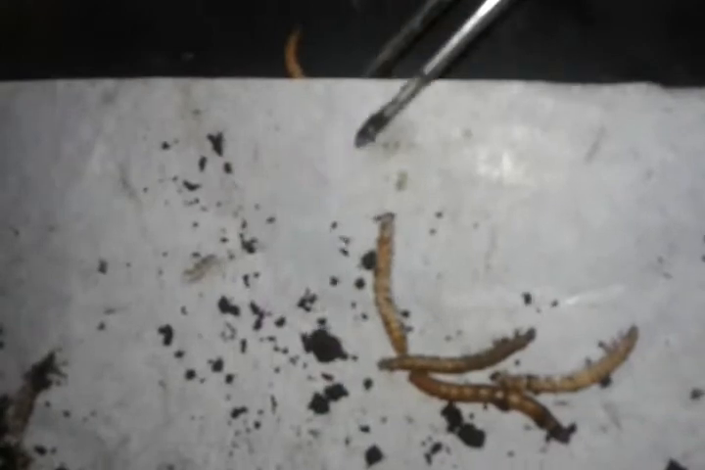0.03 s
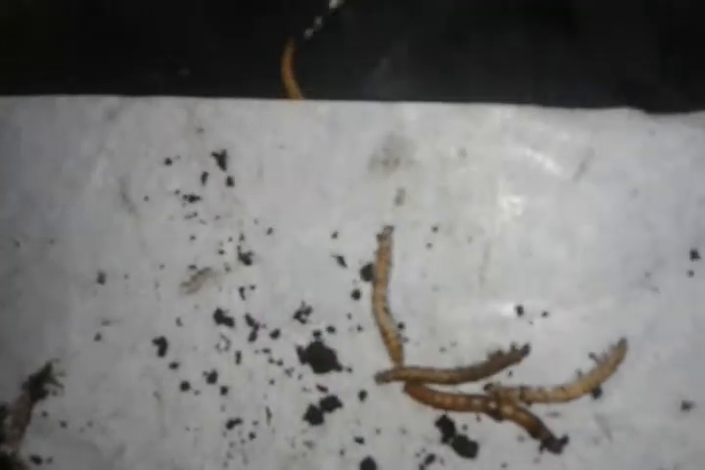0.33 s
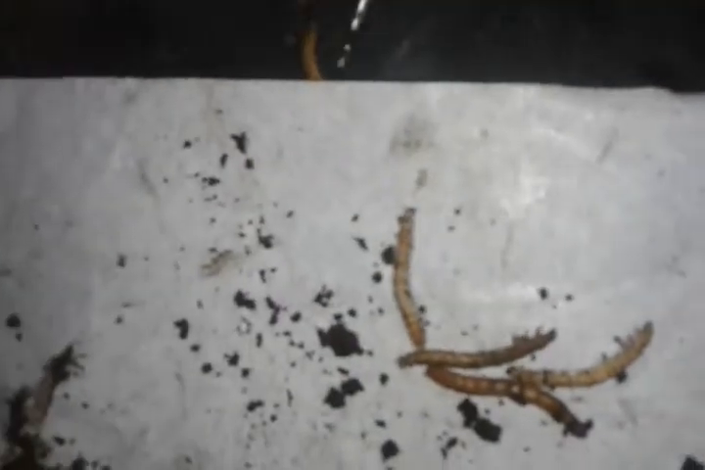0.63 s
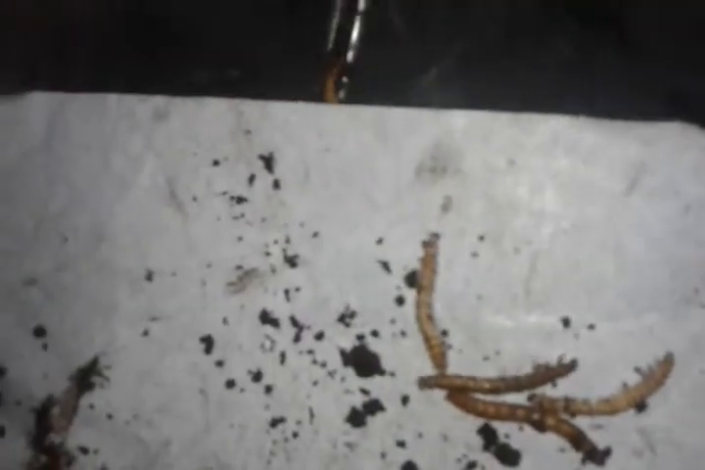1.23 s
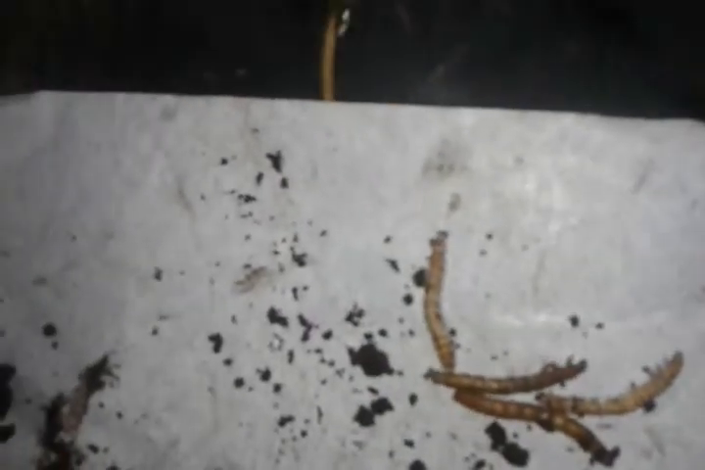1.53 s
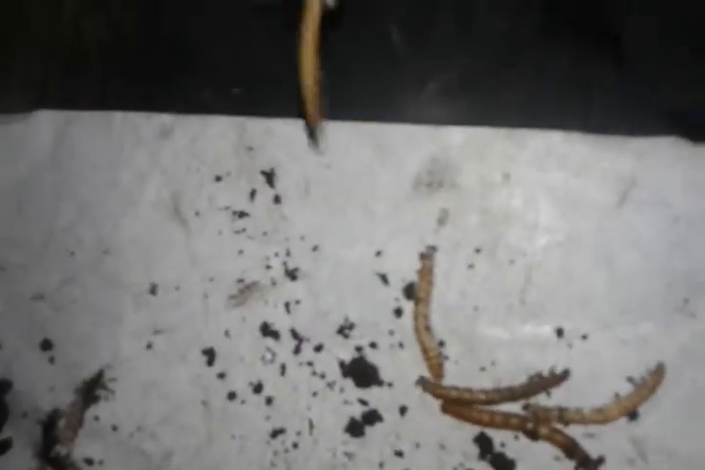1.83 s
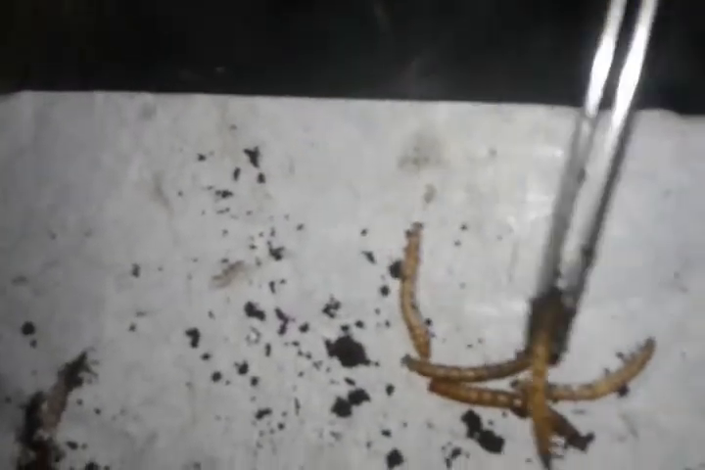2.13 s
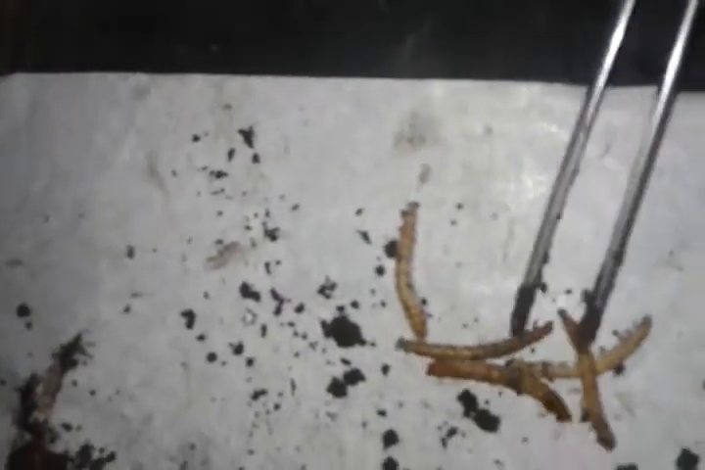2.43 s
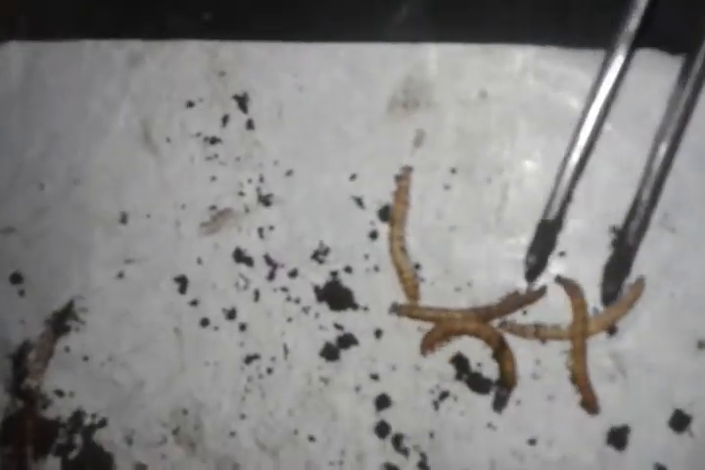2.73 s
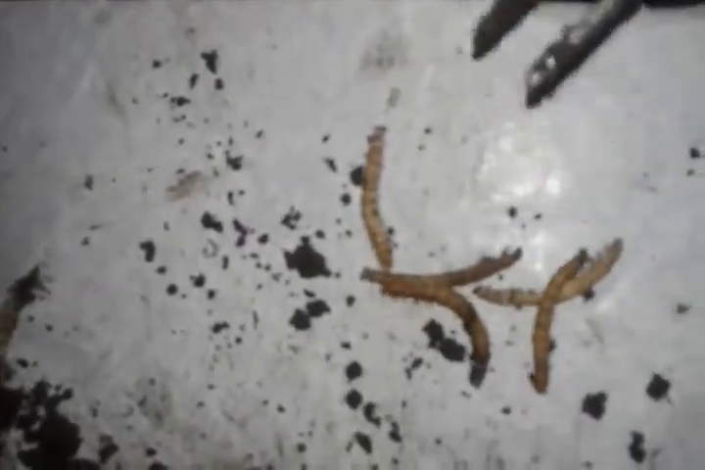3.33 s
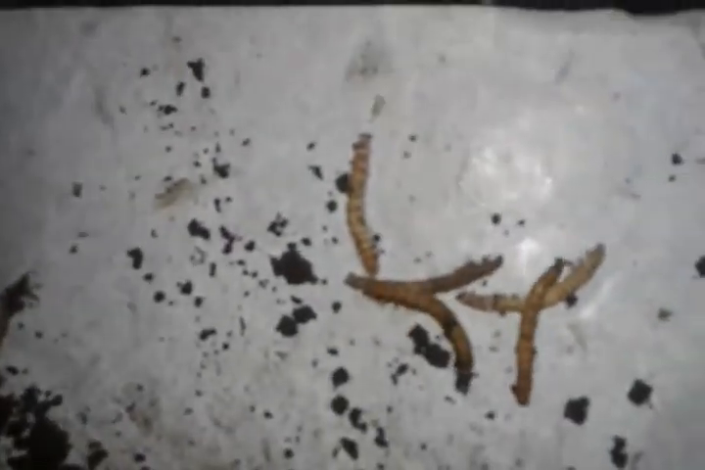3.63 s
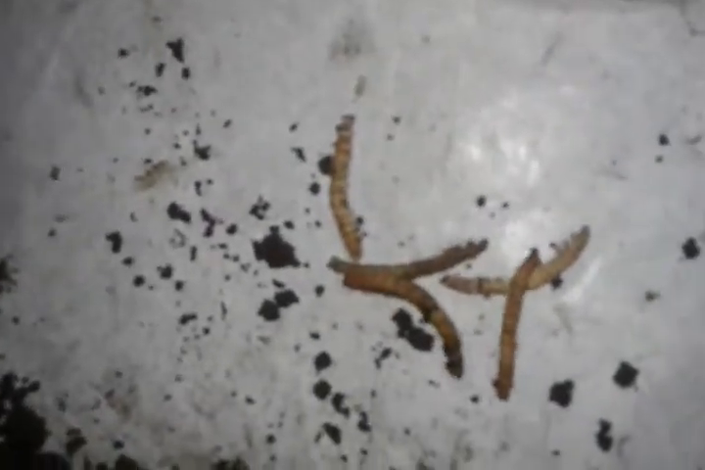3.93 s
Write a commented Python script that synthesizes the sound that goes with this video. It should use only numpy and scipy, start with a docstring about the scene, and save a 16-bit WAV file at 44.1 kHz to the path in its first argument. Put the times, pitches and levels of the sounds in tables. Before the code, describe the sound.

Close steel tweezers scraping faintly over paper, with ringing taps and sharp clicks.

```python
"""A paper-lined tray in a quiet room, close to a small microphone: steel tweezers move larvae about.
The tips scratch among crumbs, slide over the paper, tick and squeak faintly; set down, they ring
the steel and knock the tray, and a long, soft reverberation follows. Near the end the steel arms
snap and rattle. Faint room noise and a few low handling bumps lie underneath."""
import sys
import numpy as np
from scipy import signal
from scipy.fft import rfft, irfft, next_fast_len
from scipy.io import wavfile
from scipy.ndimage import map_coordinates

SR = 44100
rng = np.random.default_rng(int(sys.argv[2]) if len(sys.argv) > 2 else 0)


def put_to_file(sound):
    """Save the sound as 16-bit audio at rate SR, in the file named by the first command-line argument."""
    columns = np.atleast_2d(sound).T  # one column per channel
    safe = np.clip(columns, -1, 1)
    whole_steps = np.round(safe * 32767)
    wavfile.write(sys.argv[1], SR, whole_steps.astype(np.int16))


N = 176400

# Noise colours. Each row: frequency in Hz, relative spectral level in dB.
ROOM_COLOUR = [(25, -35), (50, -2.5), (213, 3), (403, -4.5), (700, -13), (1260, -36), (1360, -27),
               (1870, -25.5), (2710, -31.5), (4030, -25), (6000, -27), (14000, -26)]  # low room noise
GRIT_COLOUR = [(1180, -29), (2910, -24.5), (4300, -14.5), (4750, -3), (5120, 5.5), (6000, -8.5),
               (8590, -22.5), (12700, -29), (14000, -34)]  # steel scratching
PAPER_COLOUR = [(200, -2), (700, 1), (1400, 1.5), (2500, -0.5), (3800, -0.5), (5100, 7.5), (6500, -4.5),
                (9500, -16), (14000, -21.5)]  # steel sliding on paper
BRUSH_COLOUR = [(2000, -19.5), (4200, -13.5), (5300, 5), (6800, -9), (8500, -4), (11000, -13), (14000, -22)]  # light brushes and crackling crumbs
CONTACT_COLOUR = [(200, -5), (1000, -4), (1800, -12), (2300, -1.5), (3100, -6.5), (4200, -2), (5100, 6),
                  (6300, -11), (8000, -16), (10000, -24.5), (14000, -28)]  # the bite of a tap or snap
RATTLE_COLOUR = [(150, -24), (500, -3), (1400, -2.5), (1850, 8.5), (2200, 1), (3500, 0.5), (5000, -2),
                 (6500, -11.5), (9000, -26), (14000, -26)]  # the arms rattling
THUD_COLOUR = [(60, -44), (150, -4), (350, -11), (550, 5.5), (780, 1), (910, 4), (1100, -6), (1600, -9),
               (4000, -26)]  # the dull body of a click
BUMP_COLOUR = [(80, -57), (115, 17.5), (170, -4), (270, 8.5), (420, -4.5), (700, -6), (2000, -53)]  # handling
TAIL_COLOUR = [(59, -40), (100, -17.5), (229, -11.5), (318, -1), (656, -2), (895, -4), (1150, -8.5),
               (1410, -2), (1770, -14.5), (3030, -17), (3360, -13.5), (4050, -10), (5190, 2.5), (6250, -11),
               (14000, -40.5)]  # the reverb wash
# Fader rides. Each row: time in seconds, level in dB.
ROOM_FADER = [(0, -53.5), (.6, -58.5), (1.3, -61), (1.7, -56), (2.05, -59.5), (4, -53.5)]  # room noise
SCRATCH_FADER = [(0, -41), (.04, -38), (.06, -31), (.09, -35), (.135, -38), (.2, -56), (.46, -67),
                 (.535, -57.5), (.58, -63), (.76, -78), (.82, -58), (.95, -64), (1.1, -71.5), (1.43, -73.5),
                 (1.52, -51.5), (1.75, -66), (2, -73), (3.5, -73), (3.68, -53.5), (3.95, -58), (4, -51.5)]  # tips among crumbs
SLIDE_FADER = [(0, -58), (.31, -56), (.45, -61.5), (1.4, -69.5), (1.5, -53.5), (1.7, -57.5), (1.95, -68),
               (2.03, -71), (2.06, -55.5), (2.15, -66), (2.85, -58.5), (3.06, -52.5), (3.14, -54),
               (3.21, -49), (3.45, -53), (3.56, -55.5), (3.605, -44.5), (3.66, -51), (3.8, -55.5), (4, -58)]  # tips on paper
# Noise strokes. Each row: start in seconds, length in seconds, level in dB.
BRUSH_CUES = [(.211, 0.022, -50), (1.278, 0.026, -50), (1.555, .09, -54), (3.63, 0.15, -55.5)]  # light brushes over the paper
BUMP_CUES = [(3.62, 0.079, -46), (3.893, 0.046, -43.5), (3.93, 0.048, -54.5)]  # soft handling bumps
# Soft nudges. Each row: start in seconds, t60 in seconds, pitch in Hz, level in dB.
NUDGE_CUES = [(0.268, 0.51, 1650, -52), (.564, 0.056, 780, -46.5), (.9, 0.16, 770, -52.5),
              (1.68, 0.04, 1350, -50.5), (2.098, 0.025, 970, -46.5), (3.058, 0.042, 1280, -46),
              (3.278, 0.024, 1420, -40), (3.328, 0.062, 1620, -43.5), (3.59, 0.12, 1270, -39.5),
              (3.939, 0.06, 1340, -46.5)]
# Tips ticking on crumbs and on each other.
# Each row: start in seconds, level in dB, pitch in Hz, contact length in seconds.
TICK_CUES = [(0.495, -45.5, 4950, 0.00056), (0.6244, -40.5, 2300, 0.0017), (0.6296, -41.5, 5870, 0.0016),
             (0.6542, -31, 4850, 0.0008), (.853, -44, 5500, 0.0065), (1.465, -48.5, 5540, 0.0017),
             (1.497, -38.5, 5440, 0.0009), (1.506, -41, 5100, 0.0011), (1.523, -31.5, 2920, 0.0013),
             (1.526, -34.5, 3430, 0.00096), (1.541, -38, 5640, 0.001), (2.537, -36.5, 5100, 0.0027),
             (3.1033, -26, 2730, 0.00065)]
# Tips meeting the tray. Each row: start in seconds, level in dB, knock in dB relative to that level,
# contact length in seconds, reverb send in dB.
TAP_CUES = [(2.161, -13, 1.5, 0.0037, 2.5), (2.584, -34, 4.5, 0.0049, 0), (2.5875, -30, -20, 0.005, -6.5),
            (2.591, -32.5, -3, 0.0061, -13), (2.6055, -20.5, 4, 0.005, -5),
            (3.1037, -26.5, -11, 0.0043, -7), (3.53, -45, -5.5, 0.0048, -8)]
# Ringing modes. Each row: pitch in Hz, relative level in dB, t60 in seconds.
STEEL_MODES = [(2520, -35, 0.02), (5053, 3, 0.014), (5800, -16, 0.014), (7760, -13, 0.015)]  # the bright tweezers
TRAY_MODES = [(325, -1.5, 0.022), (656, 0.5, 0.018), (830, -4.5, 0.01), (1393, 3.5, .017),
              (2232, -1.5, 0.012), (3390, -19, 0.011)]  # the knock of the tray
# Squeaks of sliding steel. Each row: start in seconds, length in seconds, pitch in Hz, level in dB.
SQUEAK_CUES = [(2.913, 0.13, 3080, -62.5), (3.002, 0.089, 7900, -62)]
# Clicks of the steel arms.
# Each row: start in seconds, snap in dB, rattle in dB, thud in dB, rattle t60 in seconds.
CLICK_CUES = [(3.1859, -19.5, -32, -48.5, 0.098), (3.192, -22, -29.5, -64, 0.031),
              (3.6207, -10.5, -39, -35, 0.059), (3.635, -25, -38.5, -43, 0.057),
              (3.644, -27, -57, -48, 0.028), (3.777, -39, -44, -46.5, 0.022),
              (3.8245, -32, -61, -39, 0.026), (3.8292, -8.5, -30.5, -53, 0.04),
              (3.8336, -33, -57, -45, 0.022)]
# Early reflections off the walls. Each row: delay in seconds, relative level in dB.
REFLECTIONS = [(0.0165, -3.5), (0.034, -3), (.0415, -15), (0.0524, -8.5)]
# The diffuse tail. Each row: low edge in Hz, high edge in Hz, t60 in seconds, return gain in dB.
TAIL_BANDS = [(96, 732, 1.76, -3.5), (1030, 2950, 2, -12), (3450, 4440, 1.25, -0.5),
              (6560, 20000, 0.87, -6)]

TAP_ATTACK_S, STEEL_ATTACK_S = 0.00039, 0.0032
TOP_HZ = 14200


def amp(db):
    """Decibels to gain."""
    return 10 ** (np.asarray(db) / 20)


def unit(x):
    """Scale to rms 1."""
    return x / np.sqrt(np.mean(x ** 2) + 1e-20)


def fader(points):
    """Gain per sample from (s, dB) points."""
    return amp(np.interp(np.arange(N) / SR, *np.transpose(points)))


def filtered(x, response):
    """Filter x by a gain given as a function of Hz."""
    size = next_fast_len(len(x) + 8192)
    return irfft(rfft(x, size) * response(np.fft.rfftfreq(size, 1 / SR)), size)[:len(x)]


def eq(x, colour):
    """Shape x with (Hz, dB) points joined on a log frequency axis."""
    hz, db = np.transpose(colour)
    return filtered(x, lambda f: amp(np.interp(np.log(f + 1), np.log(hz + 1), db)))


def band(x, low_hz, high_hz):
    """Steep band-pass."""
    return filtered(x, lambda f: ((1 + (low_hz / (f + 1)) ** 10) * (1 + (f / high_hz) ** 10)) ** -.5)


def noise(colour, size):
    """Coloured noise of rms 1."""
    return unit(eq(rng.standard_normal(size), colour))


def resonance(hz, width, size):
    """Noise of rms 1 around one pitch; width is a share of the pitch."""
    white = rng.standard_normal(size)
    return unit(filtered(white, lambda f: 1 / (1 + (np.log((f + 1) / hz) / width) ** 2)))


def wobble(rate):
    """A smooth random curve, rate knots a second."""
    return map_coordinates(rng.standard_normal(int(N * rate / SR) + 4), [np.arange(N) * rate / SR])


def grains(colour, rate, spread_db, hiss):
    """Tiny slips of random size, about rate a second, on a bed of hiss; rms 1."""
    slips = (rng.random(N) < rate / SR) * rng.choice([-1, 1], N) * amp(spread_db * rng.random(N))
    return unit(eq(unit(slips) + hiss * rng.standard_normal(N), colour))


def ring(modes, t, attack_s, scatter_db=0.7):
    """Damped modes, balanced a little differently at each blow."""
    partials = (amp(db + scatter_db * rng.normal() - 60 * t / t60) * np.sin(2 * np.pi * hz * t)
                for hz, db, t60 in modes)
    return sum(partials) * (1 - np.exp(-t / attack_s))


def add(track, start, sound):
    """Mix a sound in at start seconds."""
    part = track[max(round(start * SR), 0):][:len(sound)]
    part += sound[:len(part)]


def strokes(cues, colour, rise_share):
    """Short swells of noise that rise quickly and fade."""
    out = np.zeros(N)
    for start, length, db in cues:
        progress = np.arange(SR // 4) / SR / length
        swell = (1 - np.exp(-progress / rise_share)) * np.exp(-progress ** 4)
        add(out, start, amp(db) * swell * noise(colour, len(swell)))
    return out


def room_noise():
    """A faint, low bed that slowly sinks and swells."""
    return fader(ROOM_FADER) * noise(ROOM_COLOUR, N)


def scratching(pitch_ratio=1.015):
    """Tips scratch among crumbs; the pressure flutters and the resonance wanders with the grip."""
    low, high = (grains([(hz * shift, db) for hz, db in GRIT_COLOUR], rate=1600, spread_db=6.5, hiss=0.38)
                 for shift in (1 / pitch_ratio, pitch_ratio))
    grip = np.pi / 4 * (1 + np.tanh(wobble(20)))  # equal-power crossfade
    pressure = amp(wobble(29.2) + 2.55 * wobble(200))
    return fader(SCRATCH_FADER) * (np.cos(grip) * low + np.sin(grip) * high) * pressure


def sliding():
    """Tips slide over the paper with a soft, grainy hiss and a sparse crackle of crumbs."""
    crumbs = amp(-14.5) * grains(BRUSH_COLOUR, rate=76, spread_db=-12, hiss=0)
    paper = grains(PAPER_COLOUR, rate=700, spread_db=11, hiss=1.3) * amp(wobble(35))
    return fader(SLIDE_FADER) * (paper + crumbs)


def brushes():
    """Quick, bright swishes, roughened as the tips catch on the paper."""
    catching = unit(amp(3.5 * wobble(300)))
    return catching * strokes(BRUSH_CUES, BRUSH_COLOUR, rise_share=0.027)


def nudges(rise_share=0.058):
    """Soft contacts that swell and fade in one resonance."""
    out, t = np.zeros(N), np.arange(SR // 2) / SR
    for start, t60, hz, db in NUDGE_CUES:
        swell = amp(db - 60 * t / t60) * (1 - np.exp(-t / (rise_share * t60)))
        add(out, start, swell * resonance(hz, width=0.27, size=len(t)))
    return out


def ticks(t60_s=0.01):
    """Tiny contacts of the tips: a brief chatter and one short ring."""
    out, t = np.zeros(N), np.arange(SR // 8) / SR
    for start, db, hz, length in TICK_CUES:
        chatter = amp(-1.5) * resonance(hz=4540, width=0.28, size=len(t)) * np.exp(-(t / length) ** 2)
        ping = ring([(hz, 0, t60_s)], t, TAP_ATTACK_S)
        add(out, start, amp(db) * (chatter + ping))
    return out


def taps(low_cut_hz=227):
    """Tips chatter, ring the steel and knock the tray, which radiates no bass; returns direct and send."""
    direct, send, t = np.zeros(N), np.zeros(N), np.arange(SR // 8) / SR
    no_bass = signal.butter(4, low_cut_hz, "highpass", fs=SR, output="sos")
    for start, db, knock_db, length, send_db in TAP_CUES:
        chatter = amp(-1.5) * noise(CONTACT_COLOUR, len(t)) * np.exp(-(t / length) ** 2)
        steel = amp(6) * ring(STEEL_MODES, t, STEEL_ATTACK_S)
        knock = amp(knock_db) * ring(TRAY_MODES, t, TAP_ATTACK_S)
        blow = amp(db) * signal.sosfilt(no_bass, chatter + steel + knock)
        add(direct, start, blow)
        add(send, start, amp(send_db) * blow)
    return direct, send


def squeaks():
    """Steel slipping unevenly sings in a narrow resonance that swells and fades."""
    out = np.zeros(N)
    for start, length, hz, db in SQUEAK_CUES:
        swell = signal.windows.tukey(round(length * SR))
        tone = resonance(hz, width=0.026, size=SR // 2)[:len(swell)]
        add(out, start, amp(db) * swell * tone)
    return out


def clicks(snap_hz=5060, snap_t60_s=0.003, crack_t60_s=0.014, thud_t60_s=0.11):
    """The steel arms snap hard, with a short rattle and a dull thud."""
    out, t = np.zeros(N), np.arange(SR // 4) / SR
    for start, snap_db, rattle_db, thud_db, rattle_t60 in CLICK_CUES:
        crack = noise(CONTACT_COLOUR, len(t)) * amp(-12 - 60 * t / crack_t60_s)
        snap = ring([(snap_hz, 0, snap_t60_s)], t, attack_s=0.00008)
        steel = amp(-15) * ring(STEEL_MODES, t, STEEL_ATTACK_S)
        rattle = noise(RATTLE_COLOUR, len(t)) * amp(rattle_db - 60 * t / rattle_t60)
        thud = noise(THUD_COLOUR, len(t)) * amp(thud_db - 60 * t / thud_t60_s)
        add(out, start, amp(snap_db) * (snap + steel + crack) + rattle + thud)
    return out


def bumps():
    """Handling makes soft, bassy swells."""
    return strokes(BUMP_CUES, BUMP_COLOUR, rise_share=0.14)


def reverb(send, predelay_s=0.0085, rise_s=0.009, smear_share=0.063, treble_loss_db_per_s=150):
    """Each band dies away as an even wash; the later a wall reflection, the duller and more smeared."""
    t = np.arange(2 * SR) / SR
    wash, out = noise(TAIL_COLOUR, N), np.zeros(N)
    build = 1 - np.exp(-np.maximum(t - predelay_s, 0) / rise_s)
    for low, high, t60, db in TAIL_BANDS:
        decay = (build * amp(-60 * t / t60)) ** 2
        energy = signal.fftconvolve(band(send, low, high) ** 2, decay / decay.sum())[:N]
        out += amp(db) * np.sqrt(np.abs(energy)) * unit(band(wash, low, high))
    bright = eq(send, [(300, -33), (2200, -17.5), (5200, -7), (12000, 1)])
    for delay, db in REFLECTIONS:
        dull = filtered(bright, lambda f: amp(-treble_loss_db_per_s * delay * (f / TOP_HZ) ** 2))
        smear = rng.standard_normal(SR // 20) * np.exp(-t[:SR // 20] / (smear_share * delay))
        add(out, delay, amp(db) * signal.fftconvolve(dull, smear / np.linalg.norm(smear)))
    return out


def scene():
    """The mono mix: tweezers up close, with the taps driving the reverb hardest."""
    tap, tap_send = taps()
    tick, click = ticks(), clicks()
    rub = scratching() + sliding() + brushes()
    wet = reverb(tap_send + amp(-12) * tick + amp(-28) * click + amp(-19) * rub)
    return (room_noise() + rub + nudges() + tick + tap + squeaks() + click + bumps() + wet)[None]


def record(dry):
    """The microphone sheds the deepest bass; the recorder keeps nothing above its band limit."""
    thin = signal.sosfilt(signal.butter(2, 45, "highpass", fs=SR, output="sos"), dry)
    return signal.sosfilt(signal.ellip(10, .1, 70, TOP_HZ, fs=SR, output="sos"), thin)


dry = scene()
out = record(dry)
put_to_file(out)
```